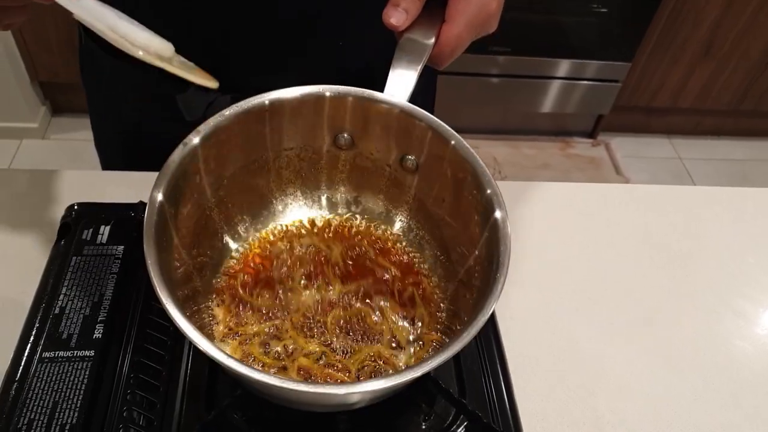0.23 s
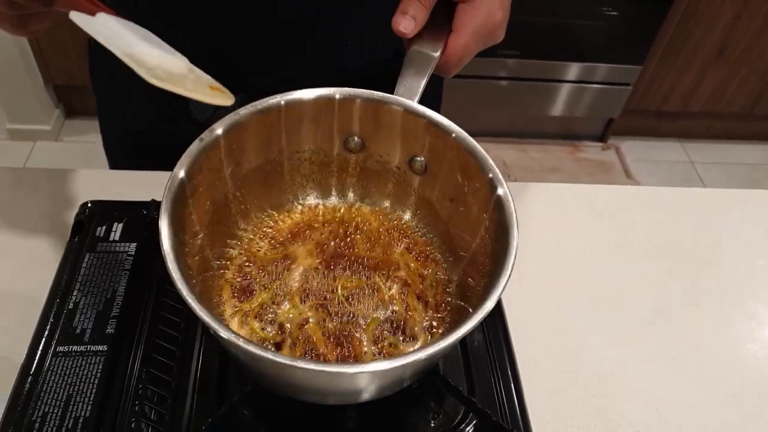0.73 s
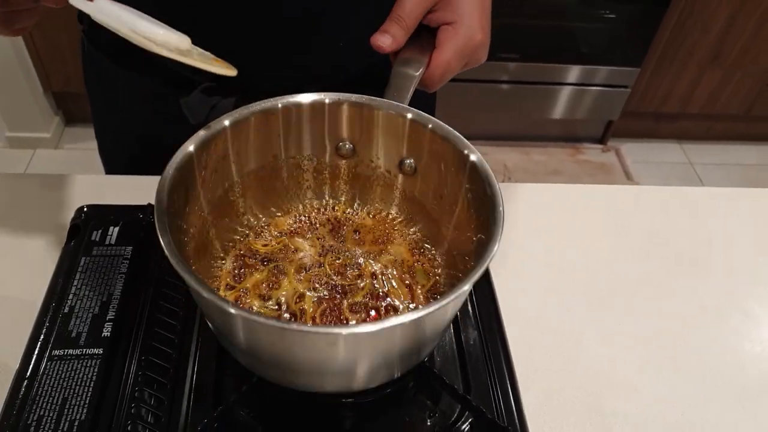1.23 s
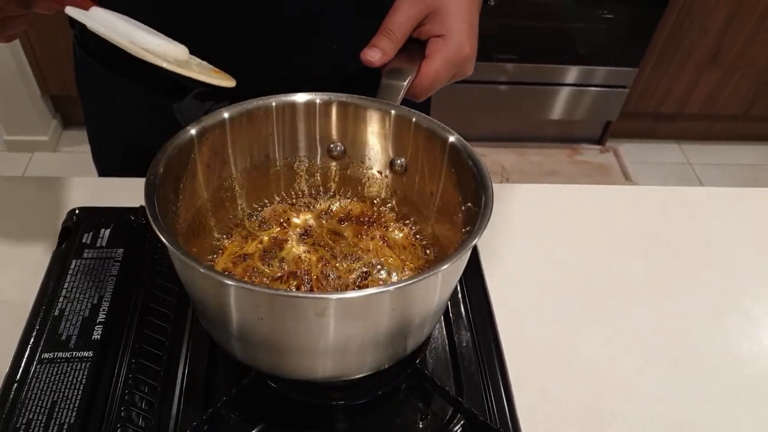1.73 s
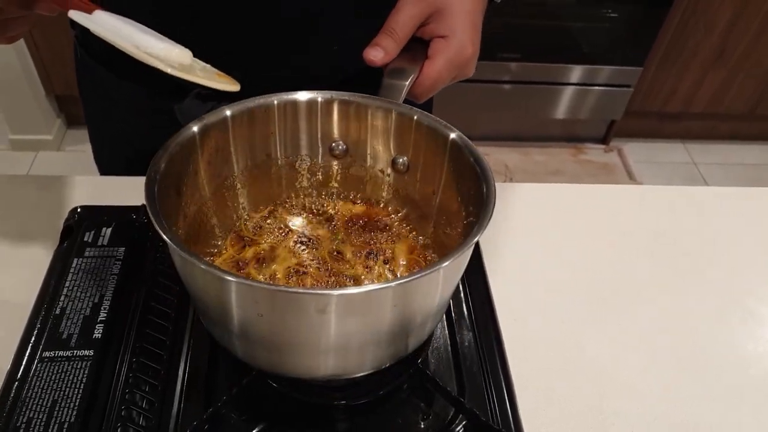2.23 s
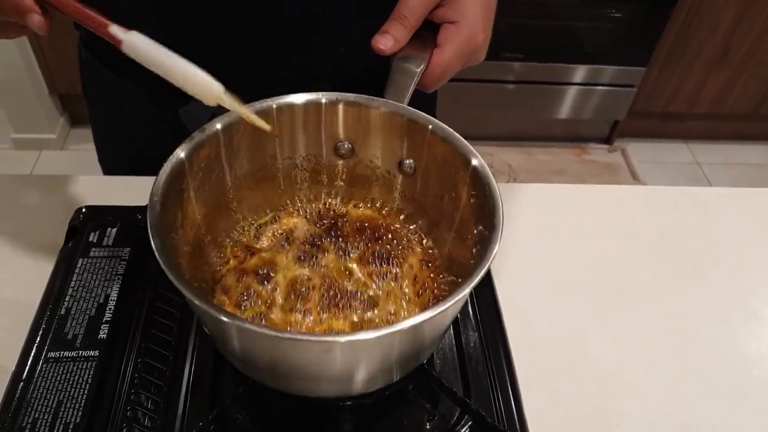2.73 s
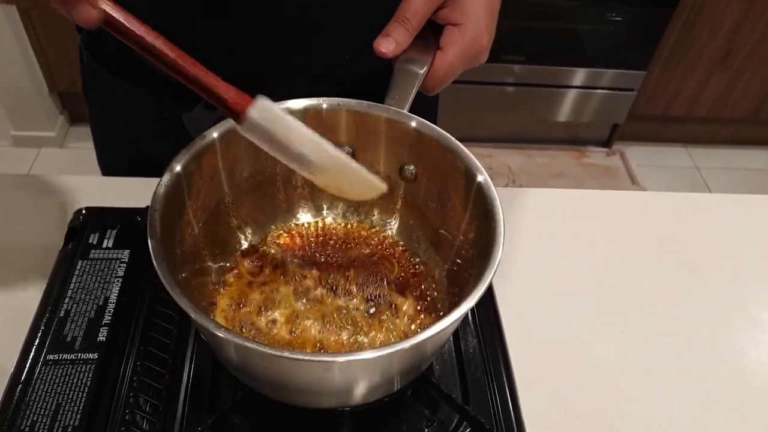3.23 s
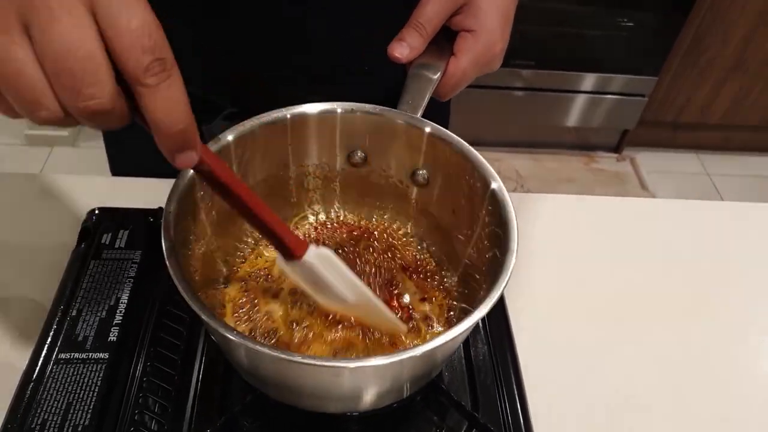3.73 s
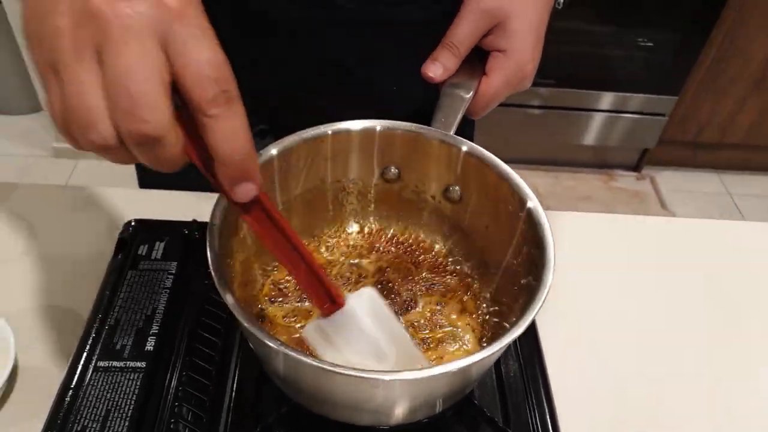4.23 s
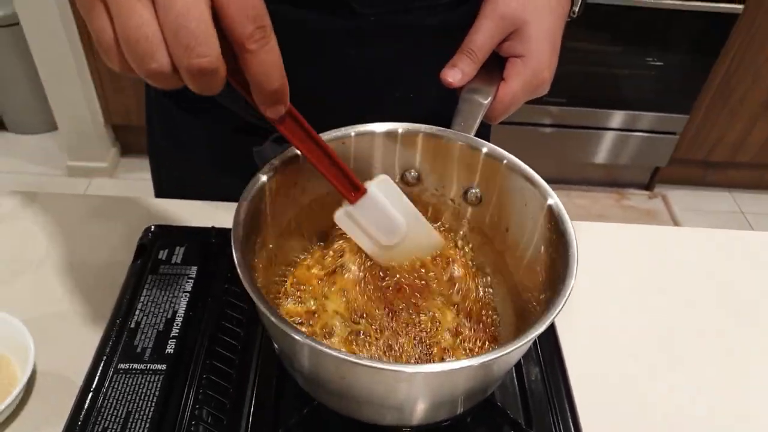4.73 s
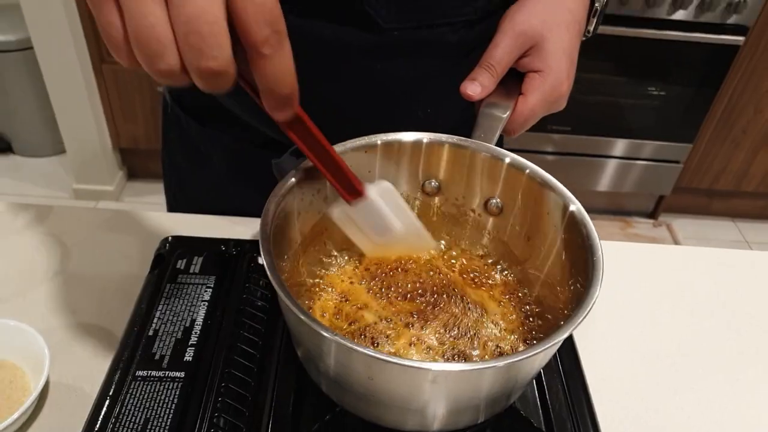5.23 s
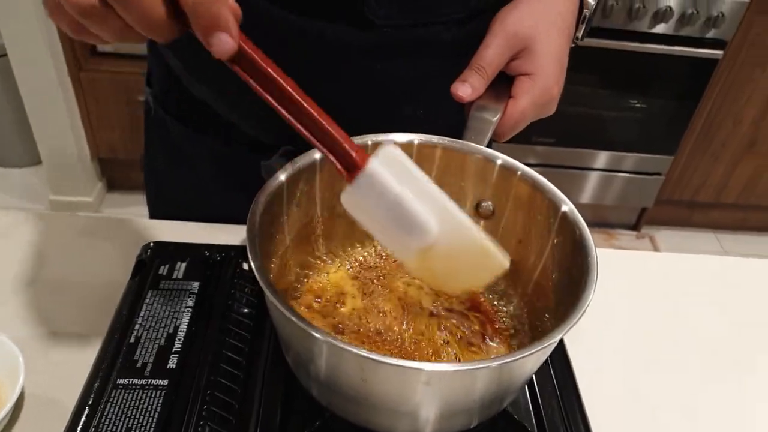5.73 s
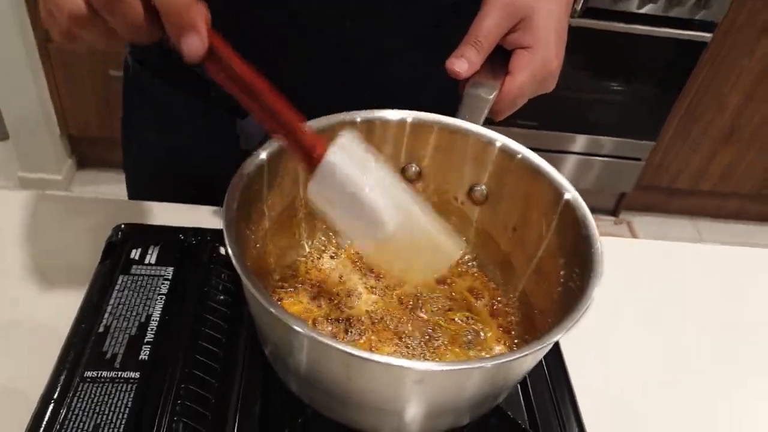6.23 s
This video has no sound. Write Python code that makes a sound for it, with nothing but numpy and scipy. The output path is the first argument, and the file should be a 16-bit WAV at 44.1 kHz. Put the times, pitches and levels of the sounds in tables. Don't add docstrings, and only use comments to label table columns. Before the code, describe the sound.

Close stereo sound in a hard, lively kitchen: quiet, constant bubbling and sizzling of thick syrup over a low flame rumble. Two dull knocks come from the pan moving on the grate, the first followed by tiny creaks. Short scraping strokes and sticky clicks follow amid popping bubbles. Three hard, bright knocks on the steel rim finish it, far louder than everything before, with a short room tail.

```python
import sys
import numpy as np
from scipy import signal
from scipy.fft import rfft, irfft, next_fast_len
from scipy.io import wavfile
from scipy.ndimage import map_coordinates

SR = 44100
rng = np.random.default_rng(int(sys.argv[2]) if len(sys.argv) > 2 else 0)


def to_wav(sig):
    pcm = np.clip(np.atleast_2d(sig), -1, 1) * 32767
    pcm = np.round(pcm).astype(np.int16)
    wavfile.write(sys.argv[1], SR, pcm.T)


def volts_from_decibels(level):
    exponent = np.asarray(level, float) / 20
    return 10 ** exponent


N = 285327

# time in seconds, large bubbles in dB, froth of small bubbles in dB.
BOIL = [(0.0, -52.5, -60.5), (0.44, -50.5, -54), (0.75, -55.5, -59.5), (1.11, -55.5, -60.5),
        (1.63, -54.5, -62.5), (2.08, -50.5, -57.5), (2.5, -51, -58.5), (2.81, -49.5, -55.5),
        (3.04, -53, -54), (3.27, -51.5, -52.5), (3.69, -49.5, -55.5), (4.01, -51, -52.5),
        (4.41, -49.5, -56), (4.61, -46, -56.5), (5.07, -50.5, -58), (5.41, -46.5, -57.5),
        (5.64, -50.5, -58), (5.87, -51.5, -58.5)]
# middle in seconds, extra fizz in dB, length in seconds.
WASHES = [
    (0.463, 5, 0.25),
    (2.25, 0, 0.32),
    (3.23, 3, 0.2),
    (4.1, -0.5, 0.15),
    (4.97, 2.5, 0.18),
    (5.9, 2.5, 0.23),
]
# middle in seconds, extra low sound in dB, extra upper sound in dB, length in seconds.
STIRS = [
    (1.35, 4.5, 1.5, 0.025),
    (3.56, 4, 7, 0.041),
    (3.7, 4, 5.5, 0.078),
    (4.5, 1.5, 2, 0.16),
    (5.38, 1.5, -2, 0.057),
]
# frequency in Hz, level in dB per Hz.
DEEP = [(210, -38), (350, -24.5), (445, -22), (473, -7), (511, -8), (560, 0.5), (643, -4), (694, 1.5),
        (770, -4), (835, -3.5), (985, -19.5), (1150, -15), (1430, -34.5), (2420, -120)]
UPPER = [(590, -32.5), (980, -22), (1070, -3.5), (1270, -10.5), (1410, 1.5), (1600, -2), (2000, -16.5),
         (2600, -56), (4400, -120)]
SMALL = [(1000, -8.5), (1700, -7), (2010, -4.5), (2320, 1), (2520, -1.5), (3080, -2), (3330, -5),
         (5500, -22.5), (7150, -54), (12100, -120)]
FIZZ = [(2350, -20), (4000, -0.5), (4550, -2), (5300, -4), (5750, -3), (7500, -9.5), (9700, -6),
        (10900, -3), (13500, -6.5), (15800, -6), (16200, -20)]
RUMBLE = [(12, -67), (28, -56), (46, 3.5), (70, 1.5), (188, 0.5), (259, -3), (330, -11.5), (375, -9.5),
          (420, -12.5), (550, -62), (920, -120)]
SPRAY = [(5000, -42), (9000, -5), (11000, -10), (13500, 1), (15800, -4), (16200, -26)]
# frequency in Hz, likeness from 0 to 1.
ALIKE = [(60, .86), (130, .93), (300, .85), (700, .88), (1400, .72), (3000, .5), (7000, .4), (15000, .2)]
# frequency in Hz, difference in dB.
LEFT_DB = [(60, 4), (110, 1), (200, 2), (380, 4), (700, 1), (1290, 3), (2380, 2), (4400, -1.5),
           (8120, -1.0), (15000, -2.5)]
# frequency in Hz, phase in radians.
LEAD = [(30, 0), (1000, .12), (2300, .4), (3100, .7), (4650, 2.6), (7400, 4.7), (11000, 7), (16000, 10)]
# start in seconds, peak in dB, pitch in Hz.
LARGE_PLOPS = [(0.201, -40, 706), (0.425, -33, 570), (0.458, -36.5, 577), (2.607, -34, 677),
               (2.696, -31, 636), (2.762, -34, 720), (3.254, -35, 570), (3.581, -36, 660),
               (3.647, -35, 703), (3.718, -30, 687), (4.095, -36, 680), (4.272, -45, 730),
               (4.486, -33, 696), (4.516, -35, 560), (4.581, -41, 695), (4.614, -34, 600),
               (4.645, -44, 696), (4.728, -44, 590), (4.942, -36, 710), (5.063, -41, 710),
               (5.327, -32, 670), (5.389, -32.5, 683), (5.348, -37, 710), (5.43, -40, 656),
               (5.459, -34, 700), (5.481, -37, 710), (5.575, -36, 650), (5.673, -45, 649)]
UPPER_PLOPS = [(0.8689, -48, 1500), (2.1779, -51, 1590), (2.811, -38, 1370), (2.87, -40, 1490),
               (3.2221, -39, 1540), (3.3977, -39, 1470), (3.5049, -39, 1500), (3.6865, -38, 1330),
               (3.8477, -40, 1450), (4.0183, -51, 1640), (4.361, -38, 1490), (4.6443, -43, 1490),
               (4.745, -50, 1380), (4.8075, -42, 1500), (4.8449, -37, 1560), (4.8803, -40, 1430),
               (5.0604, -38.5, 1460), (5.2799, -38, 1590), (5.435, -48, 1420), (5.7349, -39, 1530)]
# start in seconds, peak in dB, centre in Hz.
POPS = [(0.2249, -38, 3060), (0.408, -41, 2680), (3.089, -36, 2660), (3.144, -42, 2560),
        (3.2117, -43, 2510), (3.3429, -47, 3140), (3.4058, -38, 2600), (3.5729, -42, 3540),
        (3.5864, -35, 4080), (3.5974, -36, 3290), (3.6064, -41, 2680), (3.6794, -40, 3100),
        (5.3264, -41, 3010), (5.3384, -40, 3120)]
CREAKS = [
    (1.164, -36, 2600),
    (1.2245, -36, 2480),
    (1.243, -35, 2300),
    (1.267, -37, 2600),
    (1.282, -35, 2600),
    (1.298, -38, 2500),
    (1.318, -34, 2500),
    (1.336, -39, 3000),
    (1.358, -37, 2400),
]
CATCHES = [(3.5094, -38, 1650), (3.5464, -35, 1450), (3.555, -35, 1450), (3.572, -36, 1450),
           (3.6894, -51, 1560), (3.71, -45, 1530), (5.2915, -28, 2160), (5.301, -36, 2600),
           (5.3135, -32, 3020), (5.325, -33, 1590), (5.353, -36, 2120), (5.389, -35, 1200),
           (5.406, -35, 3070), (5.421, -31, 3560), (5.4345, -33, 3150)]
SPITS = [(2.5594, -38, 11300), (3.5854, -38, 5690), (3.599, -38, 5460), (3.593, -34, 4860),
         (3.6144, -38, 6000), (4.8205, -31, 8600), (4.883, -29.5, 6030), (4.8944, -36, 11100),
         (5.3887, -35, 7220), (5.4314, -31, 10000), (5.437, -37, 11900), (5.4454, -33, 11300),
         (5.9208, -32, 6000)]
# frequency in Hz, time to fade by 60 dB in seconds.
KITCHEN = [(150, 0.3), (700, 0.48), (2500, 0.53), (6000, 0.43), (14000, 0.2)]
# start in seconds, peak in dB, rattle's 60 dB fade in seconds, room in dB.
SET_DOWN = [
    (0.9992, -23.5, 0.049, -4),
    (1.006, -27.5, 0.028, -2),
]
SHIFT = [
    (2.8775, -23, 0.04, -1),
    (2.886, -25, 0.04, -2.5),
    (2.929, -32, 0.016, -4),
]
# frequency in Hz, level in dB per Hz.
SET_DOWN_BODY = [(47, -56), (80, -18), (127, -34), (162, -11), (270, -7.5), (345, 4), (450, -7),
                 (524, -6.5), (667, 3), (738, -5.5), (1000, -1), (1170, -7), (1550, -9), (1990, -16),
                 (2200, -5.5), (2530, -17), (10000, -36), (13000, -69), (22000, -120)]
SHIFT_BODY = [(47, -50), (80, -25), (162, 0), (280, -13.5), (378, 3.5), (428, -7.5), (568, 0), (700, -9),
              (885, -0.5), (1450, -11.5), (1760, -16.5), (1910, -8.5), (3500, -22), (7690, -30.5),
              (10000, -32), (13000, -60), (22000, -120)]
# start in seconds, peak in dB.
DRUMS = [
    (1.0, -39),
    (1.095, -43),
    (2.88, -35.5),
    (2.95, -43),
    (3.034, -50),
    (5.905, -36),
    (5.985, -24),
    (6.218, -25),
    (6.449, -33),
]
# frequency in Hz, level in dB per Hz.
STOVE = [(38, -45), (70, -6), (140, -2), (190, 0.5), (250, -16), (560, -4), (1100, -11.5), (3000, -120)]
# start in seconds, length in seconds, level in dB, place of hardest push from 0 to 1.
SCRAPES = [
    (3.502, 0.21, -48, 0.4),
    (4.778, 0.17, -49, 0.66),
    (5.264, 0.12, -44, 0.4),
    (5.348, 0.14, -43, 0.63),
]
# frequency in Hz, level in dB per Hz.
DRAG = [(710, -36), (1200, 2.5), (1540, 0.5), (1920, -7), (2410, 2.5), (2650, -11), (3110, -2.5),
        (4530, -9.5), (15500, -42)]
# start in seconds, peak in dB.
BUMP = (5.9047, -16.5)
# frequency in Hz, level in dB, 60 dB fade in seconds.
BLADE = [(177, -11.5, 0.1), (230, -12.5, 0.061), (440, -4.5, 0.15), (600, -5, .06), (660, 0.5, 0.042),
         (736, -1.5, 0.08), (1310, -17, 0.11), (1930, -19, 0.059), (2300, -17, 0.04), (2660, -19, 0.044),
         (3600, -28, .03)]
# frequency in Hz, level in dB per Hz.
PAD = [(35, -47), (80, -2), (304, -15), (742, -5), (998, -34), (1320, -17), (1430, -18), (2290, -15),
       (6500, -25), (8000, -40), (10400, -69), (17600, -120)]
# start in seconds, peak in dB, knock in dB, crack in dB, room in dB.
TAPS = [
    (5.9841, -3, -13, 1.5, -0.5),
    (6.2177, -1.5, -15, 0, -2),
    (6.4474, -1.5, -16.5, 2.5, 0),
]
# frequency in Hz, 60 dB fade in seconds, left ahead by radians.
STEEL_HZ = [300, 357, 610, 683, 1057, 1591, 2490, 3461, 4293, 4863, 4991, 5156, 5177, 5266, 5345, 5674,
            5853, 6130, 8346, 8638, 8817, 9090, 10270, 10940, 11420]
STEEL_T60 = [.12, .16, 0.11, 0.18, .1, .1, .11, .24, .3, 0.11, 0.25, .2, 0.26, .3, 0.12, 0.1, 0.18, .12,
             .14, 0.25, .075, .18, .14, .15, .12]
STEEL_LEAD = [0, .1, 0, -.1, 0, .9, 2.8, -2.5, -.5, -.8, 0, -1.5, -.8, -.4, .8, -1, -.8, .6, -1, -.3, 1.5,
              -2.6, 1, 2, -1.3]
# level in dB at the first, second and third spot hit, left louder by dB.
STEEL = [(-42, -34, -27, 4), (-33, -31.5, -35, 2), (-40, -34, -26, 0), (-23, -29.5, -34, 1),
         (-33, -34, -38, -5), (-22.5, -25, -27, -1), (-40, -32, -31.5, -4), (-31.5, -31, -28, -8),
         (-51, -37, -37, 3), (-26, -25, -21, -3), (-40, -29.5, -34, 1), (-32, -23, -26, 3),
         (-23.5, -36, -32, -3), (-38, -34, -36, 2), (-21.5, -24, -27, -6), (-22.5, -25, -30, 1),
         (-34, -22.5, -26.5, -2), (-42, -42, -53, -12), (-37, -41, -35, 6), (-37.5, -37, -33, 8),
         (-36, -25.5, -25.5, 13), (-46, -45, -40, 12), (-46, -45, -45, -6), (-43, -48, -36, -4),
         (-31, -38, -47, 1)]
# frequency in Hz, level in dB per Hz.
RIM = [(35, -58), (60, -26), (181, -10), (219, -2), (358, 6.5), (416, -18), (457, 3), (522, 5), (655, 3),
       (720, 8), (850, 6.5), (1050, 1.5), (1250, -1.5), (1480, 4), (1590, -5), (1750, 1.5), (2300, -2.5),
       (4600, -12.5), (5980, -53), (10100, -120)]
CRACK = [(2060, -34), (3500, -27), (4560, -12), (5170, -3.5), (5870, -15), (6490, -14), (7550, -20.5),
         (8960, -9), (9720, -11.5), (11500, -13.5), (13000, -19.5), (15800, -30)]

LARGE_DB, UPPER_DB, SMALL_DB, FIZZ_DB, BURNER_DB, SPRAY_DB = -50, -54.5, -54, -55, -56.5, -73
UPPER_VIGOUR, UPPER_FROTH, FIZZ_VIGOUR, FIZZ_FROTH, BURNER_VIGOUR = 0.79, 0.52, 0.39, 0.4, 0.86
FIZZ_GROWS, SPRAY_GROWS = 1, 3.8
LEFTWARD = np.array([[1], [-1]])


def unit(x):
    return x / np.sqrt(np.mean(x ** 2) + 1e-20)


def peak1(x):
    return x / np.abs(x).max()


def along(points, hz):
    f, value = np.transpose(points)
    return np.interp(np.log(hz + 1), np.log(f + 1), value)


def controls():
    s, *columns = np.transpose(BOIL)
    curves = [np.interp(np.arange(N) / SR, s, c) for c in columns]
    return [c - c.mean() for c in curves]


def swells(rows):
    s, *columns, length = np.transpose(rows)[:, :, None]
    bell = np.exp(-((np.arange(N) / SR - s) / length) ** 2)
    return [(c * bell).sum(axis=0) for c in columns]


def wobble(rate):
    knots = rng.standard_normal(int(N * rate / SR) + 4)
    return map_coordinates(knots, [np.arange(N) * rate / SR])


def filtered(x, response):
    m = next_fast_len(x.shape[-1] + SR // 2)
    return irfft(rfft(x, m) * response(np.fft.rfftfreq(m, 1 / SR)), m)[..., :x.shape[-1]]


def delayed(x, seconds):
    return filtered(x, lambda hz: np.exp(-2j * np.pi * hz * seconds))


def causal(spectrum):
    level = volts_from_decibels(along(spectrum, np.fft.rfftfreq(8192, 1 / SR))) + 1e-4
    cepstrum = irfft(np.log(level))
    cepstrum[1:4096] *= 2
    cepstrum[4097:] = 0
    return irfft(np.exp(rfft(cepstrum)))[:4096]


def ports(pair, spectrum):
    m = next_fast_len(N + 8192)
    hz = np.fft.rfftfreq(m, 1 / SR)
    turn = np.arccos(np.clip(along(ALIKE, hz), -1, 1)) / 2
    coloured = rfft(pair, m) * rfft(causal(spectrum), m)
    shared, apart = coloured * [np.cos(turn), np.sin(turn)]
    tilt = volts_from_decibels(along(LEFT_DB, hz) / 2) * np.exp(.5j * along(LEAD, hz))
    return unit(irfft([(shared + apart) * tilt, (shared - apart) / tilt], m)[:, :N])


def bursts(rate, spread_db, life_s, wash):
    chance, luck = rng.random((2, N))
    size = (chance < rate / SR) * volts_from_decibels(-spread_db * np.log(luck + 0.056))
    puff = signal.lfilter([1], [1, -np.exp(-1 / (life_s * SR))], size)
    return (unit(puff) + wash) * rng.standard_normal((2, N))


def add(out, s, x):
    at = round(s * SR)
    out[:, at:at + x.shape[1]] += x[:, :max(N - at, 0)]


def noise(t, apart):
    return rng.standard_normal(len(t)) + apart * rng.standard_normal((2, len(t)))


def rattle(t, t60, apart):
    return volts_from_decibels(-60 * t / t60) * noise(t, apart)


def blow(t, t60, apart, loose_db):
    return (t == 0) + volts_from_decibels(loose_db) * rattle(t, t60, apart)


def struck(x, spectrum):
    return peak1(signal.fftconvolve(x, causal(spectrum)[None], axes=1)[:, :x.shape[1]])


def boil():
    vigour, froth = controls()
    wash_db = swells(WASHES)[0]
    low_db, high_db = swells(STIRS)
    surge = wobble(13)
    large = bursts(450, 1.8, 0.00079, 3.5)

    deep_db = LARGE_DB + vigour + low_db + 0.76 * surge + 0.17 * wobble(20)
    deep = volts_from_decibels(deep_db) * ports(large, DEEP)

    upper_db = UPPER_DB + UPPER_VIGOUR * vigour + UPPER_FROTH * froth + high_db
    upper = volts_from_decibels(upper_db + 0.87 * surge + 0.54 * wobble(18)) * ports(large, UPPER)

    small_db = SMALL_DB + froth + .5 * surge + 0.77 * wobble(18)
    small = volts_from_decibels(small_db) * ports(bursts(800, 3.9, 0.00067, 2.4), SMALL)

    fizz_db = FIZZ_DB + FIZZ_VIGOUR * vigour + FIZZ_FROTH * froth + FIZZ_GROWS * wash_db
    fizz_db = fizz_db + 0.63 * surge + 0.24 * wobble(8.1)
    fizz = volts_from_decibels(fizz_db) * ports(bursts(1500, 2.0, 0.00043, 3.0), FIZZ)
    return deep + upper + small + fizz


def burner():
    level_db = BURNER_DB + BURNER_VIGOUR * controls()[0] + 0.45 * wobble(11)
    return volts_from_decibels(level_db) * ports(rng.standard_normal((2, N)), RUMBLE)


def spray():
    level_db = SPRAY_DB + SPRAY_GROWS * swells(WASHES)[0] + .5 * wobble(9)
    return volts_from_decibels(level_db) * ports(bursts(1500, 2.2, .0003, 2.8), SPRAY)


def plops(events, gain_db):
    cycles, rise_s = 10, 0.0016
    out, t = np.zeros((2, N)), np.arange(SR // 20) / SR
    for s, db, hz in events:
        fade = (1 - np.exp(-t / rise_s)) * volts_from_decibels(-60 * t * hz / (3 * cycles))
        ring = fade * np.sin(2 * np.pi * (hz * t + rng.random()))
        add(out, s, volts_from_decibels(db + gain_db + 1.1 * LEFTWARD) * peak1(ring))
    return out


def ticks(events, sharpness, life_s, apart, snap):
    out, t = np.zeros((2, N)), np.arange(SR // 20) / SR
    fade = (1 - np.exp(-t / 0.00033)) * np.exp(-t / (0.38 * life_s))
    for s, db, centre in events:
        width = centre / sharpness

        def band(hz):
            return 1j * hz * width / (centre * centre - hz * hz + 1j * hz * width)

        grain = fade * noise(t, apart) - snap * (t == 0)
        add(out, s, volts_from_decibels(db) * peak1(filtered(grain, lambda hz: band(hz) ** 2)))
    return out


def kitchen(x):
    hz, t, z = signal.stft(rng.standard_normal((2, SR // 2)), SR, nperseg=256)
    shared = .9 * np.exp(-hz / 1500)[:, None]
    z = shared * z[0] + np.sqrt(1 - shared ** 2) * z
    wall = 1 + 0.44 * np.exp(-((t - .018) / 0.024) ** 2)
    fade = volts_from_decibels(-60 * t / along(KITCHEN, hz)[:, None])
    tail = signal.istft(z * wall * fade, SR, nperseg=256)[1]
    tail = tail / np.linalg.norm(tail[0])
    late = np.pad(x, ((0, 0), (150, 0)))
    return signal.fftconvolve(late, tail, axes=1)[:, :x.shape[1]]


def thuds(events, body):
    contact_s = .0022
    out, t = np.zeros((2, N)), np.arange(SR // 2) / SR
    for s, db, t60, room_db in events:
        push = blow(t, t60, 0.11, loose_db=-17.5)
        dry = volts_from_decibels(db + 1.4 * LEFTWARD) * struck(push, body)
        add(out, s + contact_s, dry + volts_from_decibels(room_db) * kitchen(dry))
    return out


def stove():
    t60_s, rise_s = 0.53, 0.0073
    out, t = np.zeros((2, N)), np.arange(SR // 2) / SR
    for s, db in DRUMS:
        push = rattle(t, t60_s, 0.63) * (1 - np.exp(-t / rise_s))
        add(out, s, volts_from_decibels(db + 1.6 * LEFTWARD) * struck(push, STOVE))
    return out


def scrape():
    push_db, touch_s = 11, 0.014
    t, gain = np.arange(N) / SR, np.zeros(N)
    for s, length, db, push in SCRAPES:
        level_db = db + np.interp(t - s, [0, push * length, length], [-push_db, 0, -push_db])
        gain += volts_from_decibels(level_db) * np.clip(np.minimum(t - s, s + length - t) / touch_s, 0, 1)
    return volts_from_decibels(-1.0) * gain * ports(bursts(400, 1.7, 0.00097, 1.0), DRAG)


def bump():
    press_s, press_t60_s = 0.019, .04
    handle_hz, handle_db, handle_t60_s = 113, -9, .15
    out, t = np.zeros((2, N)), np.arange(SR // 2) / SR
    hz, level_db, t60 = np.transpose(BLADE)[:, :, None]
    ring = (volts_from_decibels(level_db - 60 * t / t60) * np.sin(2 * np.pi * hz * t)).sum(axis=0)
    choke = volts_from_decibels(-60 * np.maximum(t - press_s, 0) / press_t60_s)
    ring = ring * (1 - np.exp(-t / 0.0017)) * choke
    flex = volts_from_decibels(handle_db - 60 * t / handle_t60_s) * (1 - np.exp(-t / press_s))
    handle = flex * np.sin(2 * np.pi * handle_hz * t)
    pad = volts_from_decibels(-11.5) * struck(rattle(t, 0.062, 0.46), PAD)
    start, db = BUMP
    dry = -volts_from_decibels(db + 1.4 * LEFTWARD) * (peak1(ring) + handle + pad)
    add(out, start, dry + volts_from_decibels(-15.5) * kitchen(dry))
    return out


def taps():
    ring_db, ring_rise_s, touch_t60_s = 2.5, 0.00091, 0.046
    right_lag_s = 0.00015 * np.array([[0], [1]])
    knock_lag_s = 0.001033
    out, t = np.zeros((2, N)), np.arange(SR // 2) / SR
    hz, t60, ahead = np.array([STEEL_HZ, STEEL_T60, STEEL_LEAD])[:, :, None]
    *levels, left_db = np.transpose(STEEL)[:, :, None]
    sides_db = np.array([left_db, -left_db]) / 2
    sides_phase = np.array([ahead, -ahead]) / 2
    fade = volts_from_decibels(-60 * t / t60) * (1 + 1.16 * volts_from_decibels(-60 * t / touch_t60_s)) * (1 - np.exp(-t / ring_rise_s))
    for (s, db, knock_db, crack_db, room_db), level_db in zip(TAPS, levels):
        phase = rng.uniform(-np.pi, np.pi, hz.shape) * np.minimum(hz / 4000, 1) + sides_phase
        tones = volts_from_decibels(ring_db + level_db + sides_db) * fade * np.sin(2 * np.pi * hz * t + phase)
        ring = tones.sum(axis=1)
        crack = volts_from_decibels(crack_db - 6) * struck(blow(t, 0.03, 1.6, loose_db=2), CRACK)
        knock = struck(blow(t, 0.026, 0.43, loose_db=-16.0), RIM)
        knock = volts_from_decibels(knock_db + 6.5 + 1.4 * LEFTWARD) * knock
        dry = ring + delayed(crack, right_lag_s) + delayed(knock, knock_lag_s)
        wet = volts_from_decibels(room_db) * kitchen(volts_from_decibels(-9.0) * ring + volts_from_decibels(-3.0) * crack + volts_from_decibels(3) * knock)
        add(out, s, volts_from_decibels(db + 1.5) * (dry + wet))
    return out


def scene():
    glaze = boil() + burner() + spray()
    glaze += plops(LARGE_PLOPS, -6) + plops(UPPER_PLOPS, -2)
    glaze += ticks(POPS, 1.9, .003, .9, 5) + ticks(SPITS, 1.1, 0.006, 2.1, 3)
    pan = thuds(SET_DOWN, SET_DOWN_BODY) + thuds(SHIFT, SHIFT_BODY) + stove()
    pan += volts_from_decibels(-6) * ticks(CREAKS, 2.4, 0.0032, 1.3, 3.5)
    spatula = scrape() + ticks(CATCHES, 1.75, 0.0056, 0.74, 4.2) + bump() + taps()
    return glaze + pan + spatula


def top_cut(x):
    return signal.sosfilt(signal.butter(12, 15870, fs=SR, output="sos"), x)


def record(dry):
    low_cut_hz, top_hz = 34, 15900
    mix = filtered(dry, lambda hz: (hz < top_hz) * 1j * hz / (low_cut_hz + 1j * hz))
    return top_cut(np.clip(mix, -1, 1))


dry = scene()
out = record(dry)
to_wav(out)
```